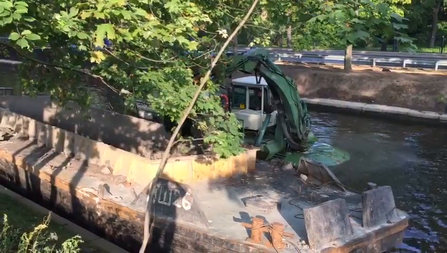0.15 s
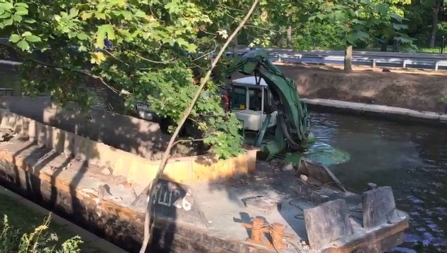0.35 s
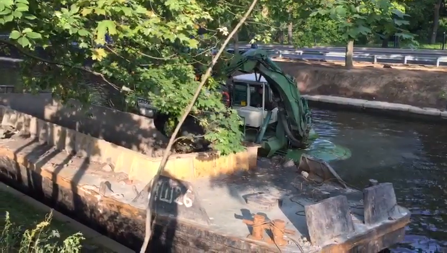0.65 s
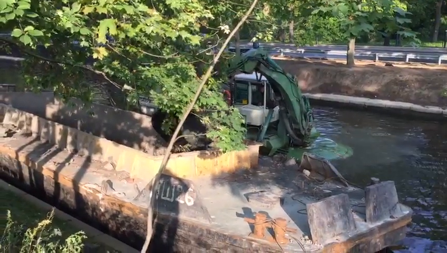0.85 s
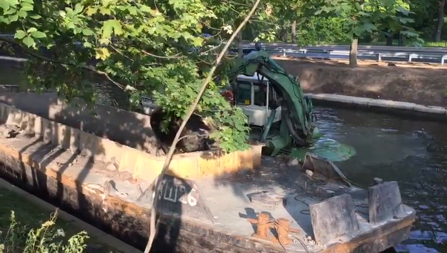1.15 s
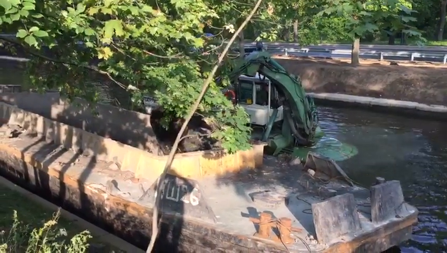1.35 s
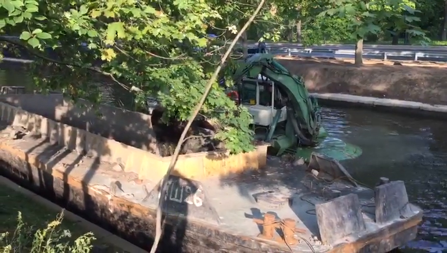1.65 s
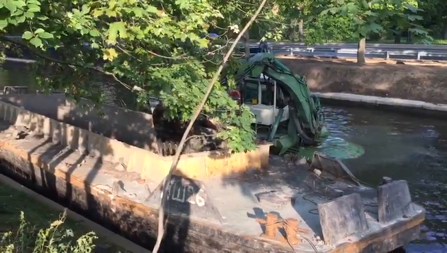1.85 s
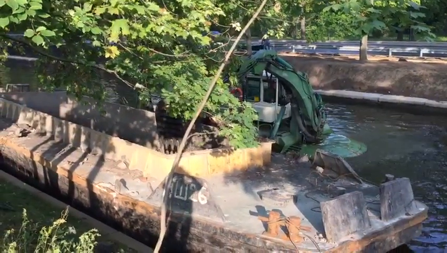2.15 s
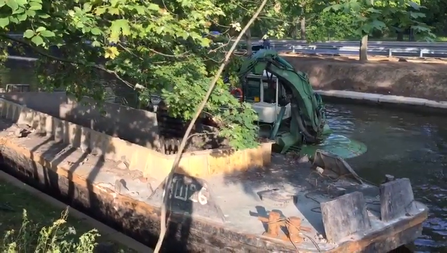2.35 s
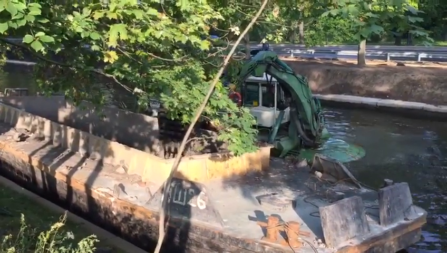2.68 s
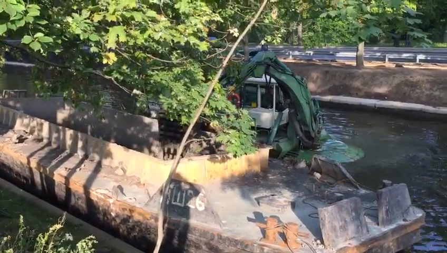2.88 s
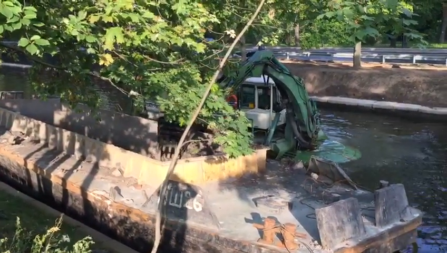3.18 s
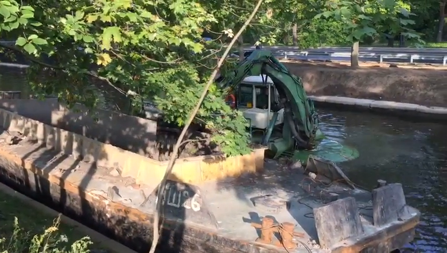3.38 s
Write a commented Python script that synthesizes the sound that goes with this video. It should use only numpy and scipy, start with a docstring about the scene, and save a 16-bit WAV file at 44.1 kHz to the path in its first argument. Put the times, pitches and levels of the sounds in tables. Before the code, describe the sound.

Dredger diesel drones and surges with load, with pouring muddy water and dull knocks on steel

```python
"""A dredger's six-cylinder diesel drones across a river, its speed sagging and surging with the load:
sines at multiples of the firing rate, with a pump whine and a noise roar that throbs with the crank.
Mud and water pour from the bucket in bright splashes, made of dense random grains in coloured bands.
Lumps knock and thud dully into the steel barge, as damped tones and bursts of noise over a rumble;
a burst also opens a splash with a slap. Faint high chirps, perhaps a far bird, come near the end."""
import sys
import numpy as np
from scipy import signal
from scipy.io import wavfile
from scipy.ndimage import uniform_filter1d

SR = 44100
rng = np.random.default_rng(int(sys.argv[2]) if len(sys.argv) > 2 else 0)


def boost(x):
    """Linear amplitude factor 10**(x/20) for a level x in decibels (scalar or array-like)."""
    u = np.asarray(x, float) / 20
    return 10 ** u


def digitize_waveform(pressure):
    """Quantize a signal to 16-bit integers and store it at the path in sys.argv[1].

    Rows of a 2-D input are taken as channels; values are limited to [-1, 1].
    """
    field = np.atleast_2d(pressure).T
    bounded = np.clip(field, -1, 1)
    quanta = np.round(bounded * 32767).astype(np.int16)
    wavfile.write(sys.argv[1], SR, quanta)


N = 155232  # length in samples

# How the load shows in roar and pump. Each row: time in seconds, roar level in dB, whine level in dB.
MACHINE_LOAD = [(0, -34.5, -40), (.4, -35, -47.5), (.75, -34.5, -42), (.88, -35, -53), (1.2, -33, -49),
                (1.6, -32.5, -58), (2.0, -34, -54), (2.3, -35.5, -58), (2.6, -34.5, -50),
                (2.9, -32.5, -48.5), (3.2, -34, -43.5), (3.52, -32, -40.5)]


def rms_one(x):
    """Scale to rms 1."""
    return x / np.sqrt(np.mean(x ** 2) + 1e-20)


def in_time(rows):
    """Columns of a curve, interpolated sample by sample; the first column is seconds."""
    s, *columns = np.transpose(rows)
    return [np.interp(np.arange(N) / SR, s, column) for column in columns]


def drift(rate_hz):
    """Slow chance of rms 1: noise through two equal poles, worked out at every 40th sample."""
    r = np.exp(-80 * np.pi * rate_hz / SR)
    noise = rng.standard_normal(N // 40 + 2002)
    slow = signal.lfilter([1], [1, -2 * r, r * r], noise)[2000:]  # drop the run-in
    return np.interp(np.arange(N) / 40, np.arange(len(slow)), rms_one(slow))


def bandpass(x, order, low_hz, high_hz):
    """Butterworth band between two edges."""
    return signal.sosfilt(signal.butter(order, [low_hz, high_hz], "band", fs=SR, output="sos"), x)


def coloured(sources, spectrum, patchy_db, patch_hz):
    """Quarter-octave bands, in turn from two unrelated sources, each with its level and flicker; rms 1."""
    out = 0
    edges = 28 * 2 ** (np.arange(36) / 4)
    hz, db = np.transpose(spectrum)
    together = drift(patch_hz)
    for k, (low, high) in enumerate(zip(edges, edges[1:])):
        middle = np.log(low * high) / 2
        level_db = np.interp(middle, np.log(hz), db, left=-200, right=-200)
        if level_db > -150:  # skip bands outside the spectrum
            band = bandpass(sources[k % 2], 2, low, high)
            flicker_db = patchy_db * (0.47 * together + drift(patch_hz))
            out = out + band * boost(level_db + flicker_db)
    return rms_one(out)


def swell(s, attack_s, t60):
    """Smooth rise to a peak at s, then an exponential fall of 60 dB in t60 seconds."""
    t = np.arange(N) / SR - s
    rise = np.exp(-2 * (t / attack_s) ** 2)
    fall = boost(-60 * np.maximum(t, 0) / t60)
    return np.where(t < 0, rise, fall)


def chirps():
    """Faint high chirps, perhaps a far bird: short tones made slightly rough by a wavering phase."""
    # Each row: centre in seconds, peak level in dB, pitch in Hz, length in seconds.
    chirp_rows = [(2.9, -57, 6800, .015), (3.187, -55, 4950, .015), (3.2, -58, 6000, .025),
                  (3.247, -56, 5750, .015), (3.295, -59, 8000, .02), (3.36, -56, 5700, .025),
                  (3.422, -53, 5300, .016), (3.43, -62, 8250, .025), (3.5, -56, 5550, .04)]
    t = np.arange(N) / SR
    waver_turns = .2 * drift(60)
    out = 0
    for s, db, hz, length in chirp_rows:
        envelope = np.exp(-.5 * (2 * (t - s) / length) ** 4)
        out = out + boost(db) * envelope * np.sin(2 * np.pi * (hz * t + waver_turns))
    return out


def rumble():
    """Low, lumpy rumble from the barge: coloured noise that rises and falls."""
    # Level of the rumble. Each row: time in seconds, level in dB.
    rumble_level = [(0, -45), (.6, -58), (1.1, -45.5), (1.35, -38), (1.6, -41.5), (1.9, -37), (2.1, -41.5),
                    (2.6, -51), (2.8, -33), (3.0, -39), (3.2, -34.5), (3.52, -41)]
    # Spectrum of the rumble. Each row: frequency in Hz, relative level in dB per Hz.
    rumble_colour = [(35, -20), (60, -8), (90, -3), (160, -0.5), (230, -4.5), (350, -8.5), (600, -37.5)]
    level_db, = in_time(rumble_level)
    noise = rng.standard_normal((2, N))
    return boost(level_db) * coloured(noise, rumble_colour, patchy_db=1.0, patch_hz=9.3)


def thuds_and_slap():
    """Dull thuds in the barge, and the low slap that opens a splash: noise bursts between two pitches."""
    # Each row: peak in seconds, peak level in dB, low edge in Hz, high edge in Hz, 60 dB decay in seconds.
    burst_rows = [(1.33, -43, 122, 450, .5), (1.33, -33.5, 900, 3200, .3), (1.8, -31, 250, 695, 0.63),
                  (1.875, -36, 150, 503, 0.21), (2.86, -32, 90, 195, 0.8), (2.95, -32, 94, 237, 0.43),
                  (3.09, -34.5, 133, 221, 0.33), (3.27, -32, 85, 170, 0.39), (3.349, -32, 185, 400, 0.29),
                  (3.471, -35.5, 182.5, 347, 0.36)]
    attack_s = 0.016
    out = 0
    for s, db, low_hz, high_hz, t60 in burst_rows:
        band = bandpass(rng.standard_normal(N), 3, low_hz, high_hz)
        # flatten the noise's own ups and downs so the swell alone shapes it
        even = band / np.sqrt(uniform_filter1d(band ** 2, size=900) + 1e-12)
        out = out + boost(db) * swell(s, attack_s, t60) * even
    return out


def knocks():
    """Lumps hit and bounce with short hollow knocks: a few cycles of one pitch, quickly damped."""
    # Each row: start in seconds, peak level in dB, pitch in Hz.
    knock_rows = [(1.803, -21, 616), (1.82, -22, 364), (1.829, -25, 530), (1.841, -21, 525),
                  (1.873, -23, 400), (2.937, -14, 147), (2.959, -14.5, 134), (2.981, -17, 140),
                  (2.995, -22, 168), (3.026, -19, 129), (3.061, -24, 119.9), (3.08, -23, 150),
                  (3.225, -26, 109), (3.268, -20, 108.1)]
    rise_cycles, t60_cycles = .4, 7.0
    t = np.arange(N) / SR
    out = 0
    for s, db, hz in knock_rows:
        rise_s = rise_cycles / hz
        envelope = swell(s + rise_s, rise_s, t60_cycles / hz)
        out = out + boost(db) * envelope * np.sin(2 * np.pi * hz * (s - t))
    return out


def drops():
    """Two streams of dense water grains: single-sample clicks of uneven size and either sign."""
    drops_per_s, spread_db = 8200, 2.5  # rate in each stream; mean scatter before the cap
    size_db = spread_db * np.minimum(rng.exponential(1, (2, N)), 5)
    sizes = boost(size_db) * rng.choice([-1, 1], (2, N))
    return sizes * (rng.random((2, N)) < drops_per_s / SR) + 1e-18


def trickle():
    """Running water: grains coloured into a bright hiss whose level wanders."""
    # Level of the hiss. Each row: time in seconds, level in dB.
    trickle_level = [(0, -49), (.5, -46.5), (.68, -50), (1.0, -44.5), (1.35, -42), (1.6, -49.5), (2.0, -48),
                     (2.3, -53), (2.55, -53.5), (2.8, -60.5), (2.95, -53), (3.15, -57), (3.3, -57),
                     (3.52, -54)]
    # Spectrum of the hiss. Each row: frequency in Hz, relative level in dB per Hz.
    trickle_colour = [(1500, -20), (3000, 4), (4800, -4.5), (5700, -1), (7500, -12.5), (8500, -2),
                      (10000, -13.5), (12000, -15.5)]
    level_db, = in_time(trickle_level)
    return boost(level_db) * coloured(drops(), trickle_colour, patchy_db=1.65, patch_hz=13.5)


def sizzle():
    """A thin sizzle high up: one stream of grains in a narrow treble band, fading from the start."""
    start_db, t60_s = -49.5, 2.3
    grains = rms_one(bandpass(drops()[0], 6, 8130, 11000))
    return boost(start_db + drift(11)) * swell(0, 1, t60_s) * grains


def splashes():
    """Mud and water pour from the bucket: coloured grains under swells summed in power."""
    # Each row: peak in seconds, peak level in dB, attack in seconds, 60 dB decay in seconds.
    splash_rows = [(1.152, -31.5, .025, 0.75), (1.18, -36.5, .025, 0.55), (1.212, -38, 0.018, 0.17),
                   (1.351, -29.5, 0.029, 1.14), (1.41, -35, .03, 1.0), (1.46, -37, 0.025, 0.85),
                   (1.8, -34.5, 0.11, 1.34), (1.9, -37.5, 0.043, 0.4), (2.15, -39.5, 0.044, 0.74),
                   (2.32, -41, 0.034, 0.71), (2.7, -47, .03, .3), (2.9, -47, .015, .6),
                   (3.01, -45, .05, .25), (3.23, -46, 0.1, 0.86), (3.35, -44, 0.031, 3.5)]
    # Spectrum of the splashes. Each row: frequency in Hz, relative level in dB per Hz.
    splash_colour = [(400, -1), (650, -6.5), (1100, -6), (1440, -4), (2650, -13), (4000, -16), (5700, -16),
                     (8000, -22.5), (10000, -26.5), (12000, -43)]
    power = sum((boost(db) * swell(s, attack_s, t60)) ** 2 for s, db, attack_s, t60 in splash_rows)
    return np.sqrt(power) * coloured(drops(), splash_colour, patchy_db=1.84, patch_hz=25)


def firing_cycles():
    """Count of firings so far: the summed firing rate, which sags and surges with the load."""
    # Engine speed. Each row: time in seconds, firings per second in Hz.
    engine_speed = [(0, 62.3), (.2, 62.15), (.45, 60.34), (.7, 59.12), (.95, 60.5), (1.2, 62.26),
                    (1.5, 62.96), (1.93, 63.18), (2.07, 64.16), (2.2, 66.24), (2.45, 65.1), (2.65, 64.1),
                    (2.85, 62.6), (3.1, 61.53), (3.35, 60.42), (3.52, 61)]
    hz, = in_time(engine_speed)
    return np.cumsum(hz) / SR


def roar(cycles):
    """Roar of housing, fan and river: coloured noise that throbs with each turn of the crank."""
    # Spectrum of the roar. Each row: frequency in Hz, relative level in dB per Hz.
    roar_colour = [(30, -30), (50, -21.5), (66, -0.5), (90, -15.5), (113, -13.5), (229, -16), (300, -18),
                   (380, -11), (479, -15.5), (568, -13.5), (726, -20.5), (950, -12), (1100, -15.5),
                   (1500, -18), (2100, -23), (3000, -31), (4400, -32), (5000, -46), (7000, -41.5),
                   (10500, -61.5), (12000, -54)]
    throb_depth, firings_per_turn = .09, 3
    level_db = in_time(MACHINE_LOAD)[0]
    noise = coloured(rng.standard_normal((2, N)), roar_colour, patchy_db=1.3, patch_hz=4.9)
    throb = 1 + throb_depth * np.sin(2 * np.pi * cycles / firings_per_turn)
    return boost(level_db) * noise * throb


def order_tone(cycles, order, level_db):
    """A tone at a multiple of the firing rate, its level wavering and its phase jittering."""
    waver_db, waver_hz, jitter_cycles = 1.2, 8, .005
    phase = order * (cycles + jitter_cycles * drift(8.9)) + rng.random()
    level = np.sqrt(2) * boost(level_db + waver_db * drift(waver_hz))  # dB is rms, hence the root 2
    return level * np.sin(2 * np.pi * phase)


def pump_whine(cycles):
    """The pump whines at 16.55 times the firing rate, louder and softer with the load."""
    return order_tone(cycles, 16.55, in_time(MACHINE_LOAD)[1])


def engine(cycles):
    """The diesel's drone: a sine at the firing rate and its orders, all locked to the same speed."""
    # Exhaust note. Each row: time in seconds, rms level in dB.
    exhaust_level = [(0, -25), (.3, -25), (.42, -29.5), (.51, -36.5), (.6, -28.5), (.7, -27.5), (.95, -27),
                     (1.08, -28.5), (1.3, -24), (1.6, -23.5), (1.85, -23), (2.1, -24.5), (2.23, -32.5),
                     (2.36, -25), (2.72, -26.5), (2.95, -25), (3.15, -28), (3.32, -30.5), (3.52, -29)]
    # Overtones that swell and fade. Each row: time in seconds, then rms levels in dB
    # of the 2nd, 3rd, 6th and 9th multiples of the firing rate.
    overtone_levels = [(0, -52, -50, -35.5, -42), (.28, -50, -54, -35.5, -41), (.42, -40, -50, -45, -43),
                       (.6, -40, -46, -48, -46), (.75, -41, -48, -49, -46), (.95, -39, -52, -41, -43),
                       (1.06, -48, -48, -45, -42), (1.2, -50, -50, -37.5, -44), (1.32, -46, -47, -39, -43),
                       (1.5, -45, -45, -41, -46), (1.9, -46, -46, -41.5, -45), (2.1, -42, -48, -38.5, -45),
                       (2.4, -41, -49, -37.5, -50), (2.62, -42, -48, -41, -45), (2.75, -52, -44, -41, -47),
                       (2.9, -46, -44, -37.5, -43), (3.02, -44, -43, -37, -37), (3.12, -46, -44, -45, -38),
                       (3.17, -46, -46, -48, -48), (3.25, -43, -45, -50, -42), (3.4, -44, -48, -41, -39),
                       (3.52, -42, -46, -39, -38.5)]
    # Those overtones, as multiples of the firing rate.
    overtone_orders = [2, 3, 6, 9]
    # Weak orders of steady mean level, as multiples of the firing rate; thirds come from unequal cylinders.
    steady_orders = [2 / 3, 4 / 3, 5 / 3, 8, 18]
    # The mean level of each weak order, rms in dB.
    steady_levels = [-54.5, -52, -50, -59, -52]
    note_db, = in_time(exhaust_level)
    out = np.sqrt(2) * boost(note_db) * np.sin(2 * np.pi * cycles)
    for order, level_db in zip(overtone_orders, in_time(overtone_levels)):
        out = out + order_tone(cycles, order, level_db)
    for order, level_db in zip(steady_orders, steady_levels):
        out = out + order_tone(cycles, order, level_db)
    return out


def scene():
    """Everything heard from the bank, in one channel."""
    cycles = firing_cycles()
    impacts = thuds_and_slap() + knocks()
    water = trickle() + sizzle() + splashes()
    machine = roar(cycles) + pump_whine(cycles) + engine(cycles)
    return (chirps() + rumble() + impacts + water + machine)[None]


def roll_off(x):
    """The treble ends steeply here."""
    return signal.sosfilt(signal.butter(12, 11000, fs=SR, output="sos"), x)


def record(dry):
    """The microphone's mix, with the treble cut steeply above 10350 Hz."""
    low_pass = signal.ellip(12, .5, 70, 10350, fs=SR, output="sos")  # ripple and stop depth in dB
    mix = signal.sosfilt(low_pass, dry)
    return roll_off(mix)


dry = scene()
out = record(dry)
digitize_waveform(out)
```